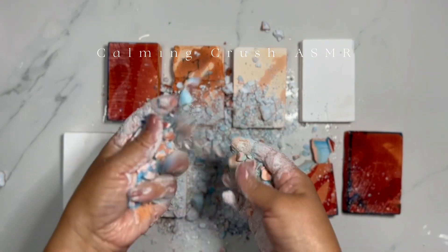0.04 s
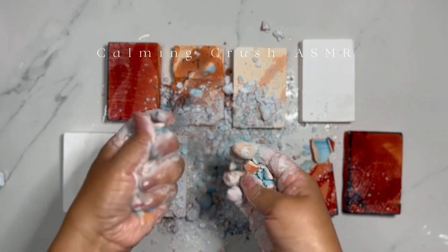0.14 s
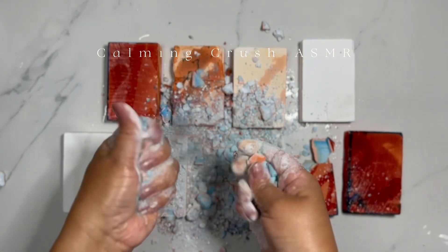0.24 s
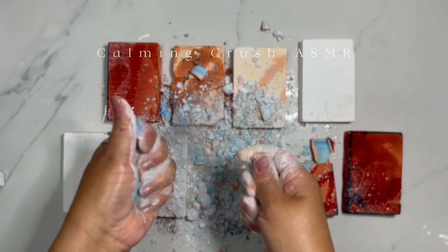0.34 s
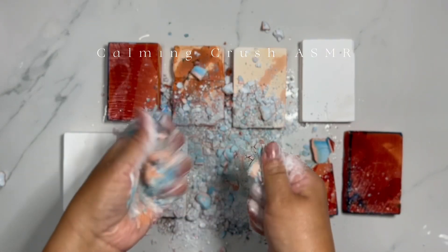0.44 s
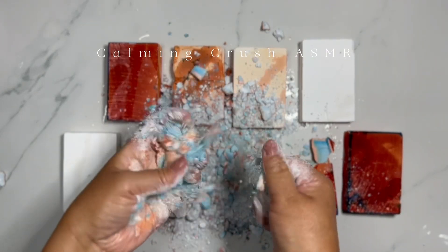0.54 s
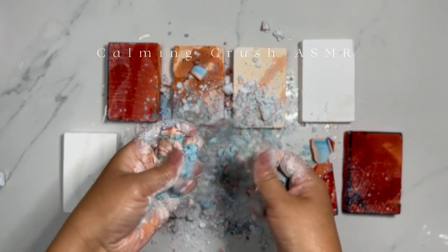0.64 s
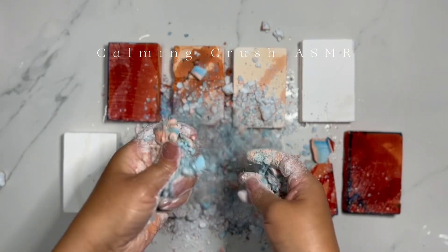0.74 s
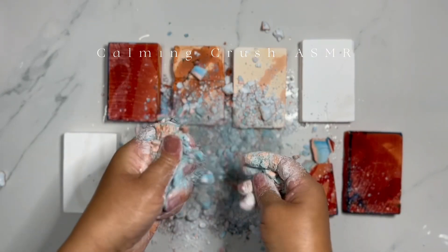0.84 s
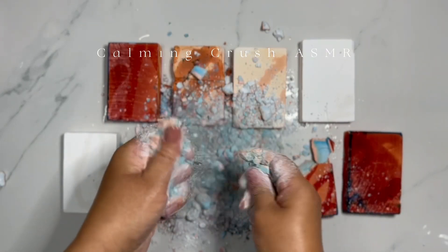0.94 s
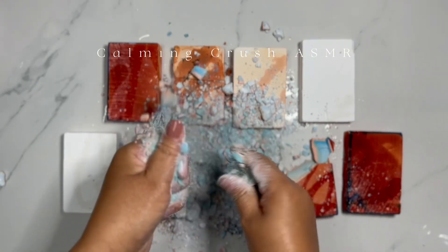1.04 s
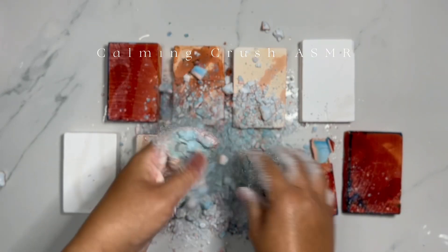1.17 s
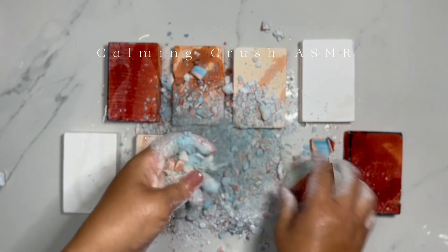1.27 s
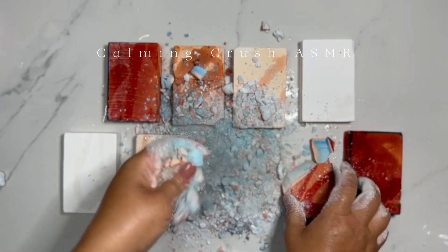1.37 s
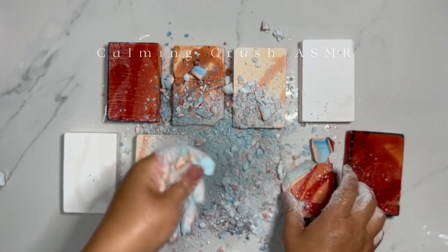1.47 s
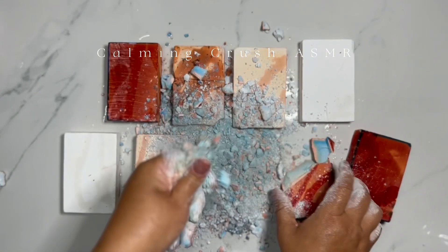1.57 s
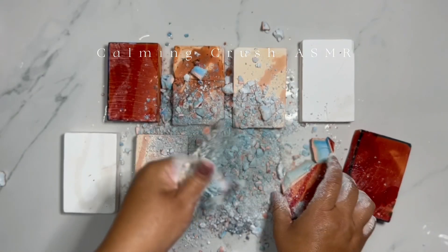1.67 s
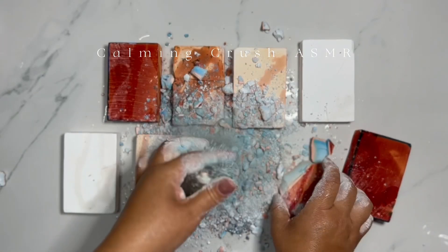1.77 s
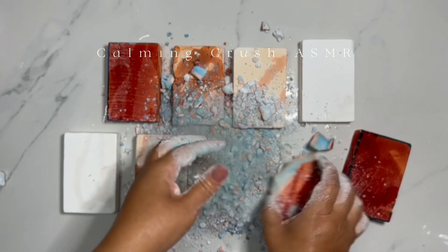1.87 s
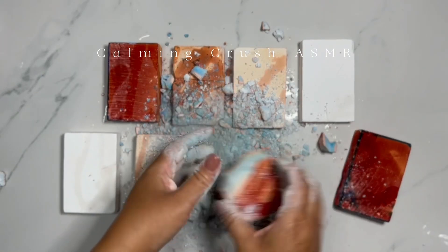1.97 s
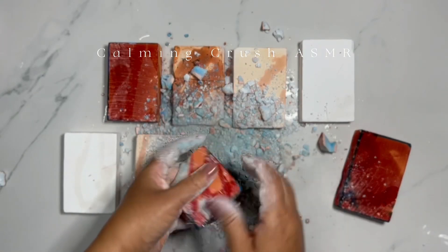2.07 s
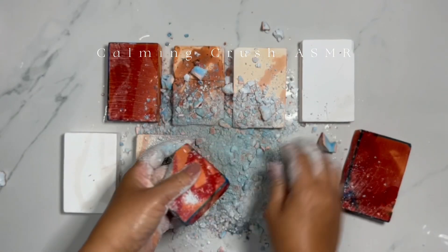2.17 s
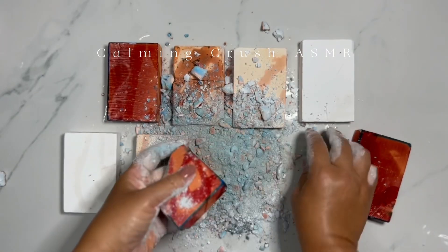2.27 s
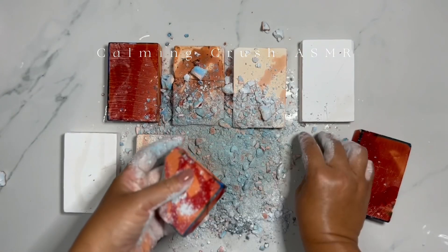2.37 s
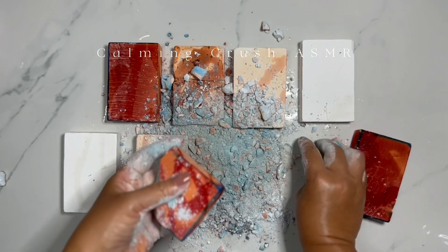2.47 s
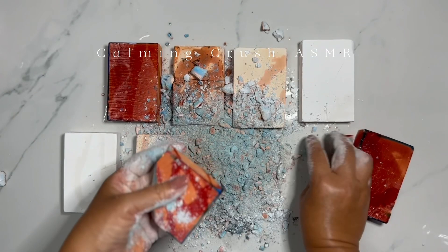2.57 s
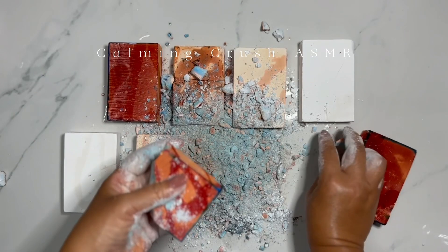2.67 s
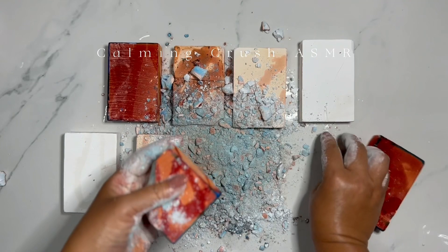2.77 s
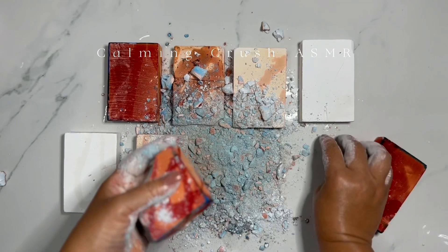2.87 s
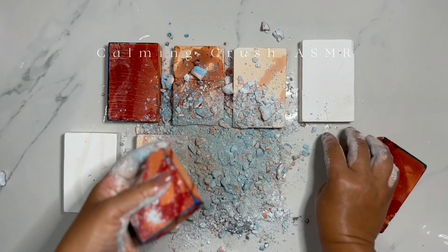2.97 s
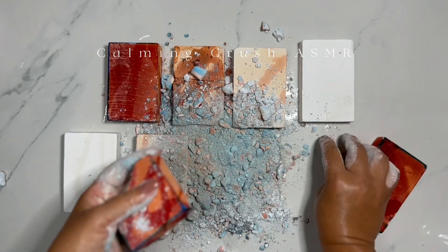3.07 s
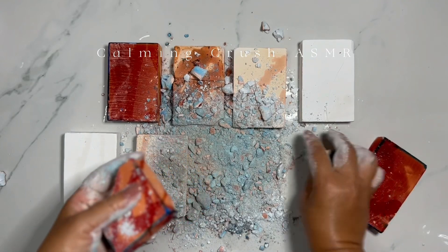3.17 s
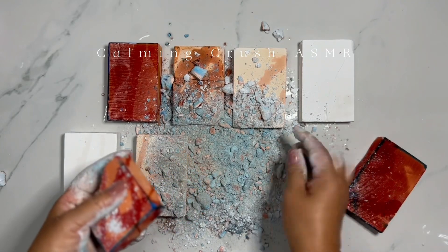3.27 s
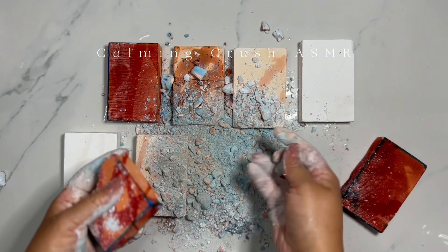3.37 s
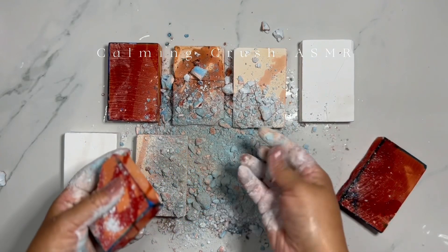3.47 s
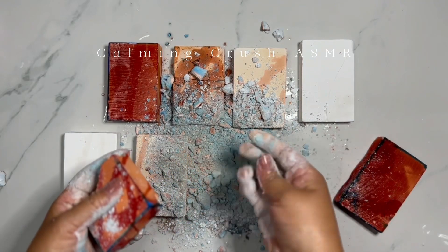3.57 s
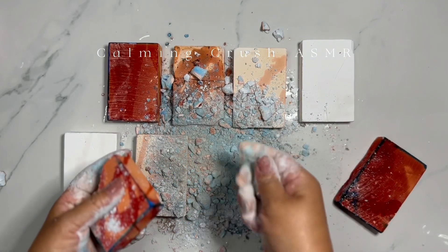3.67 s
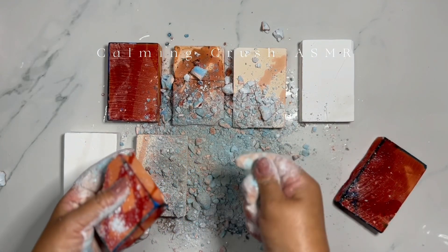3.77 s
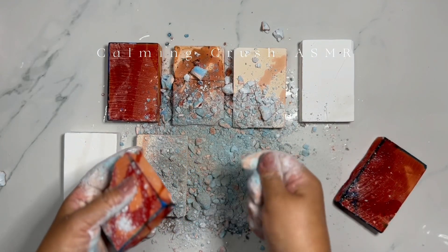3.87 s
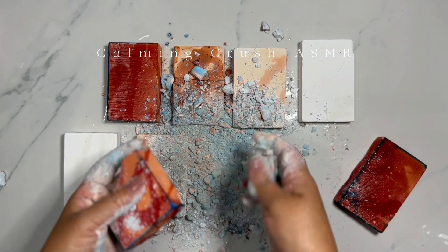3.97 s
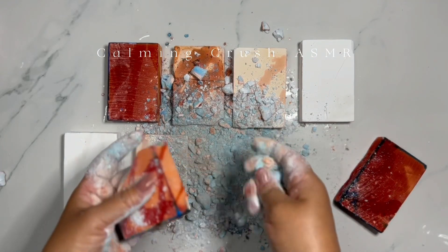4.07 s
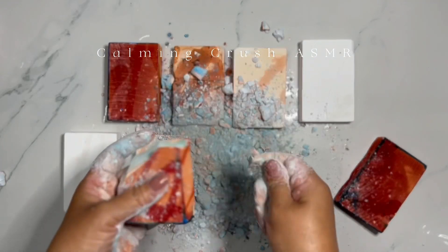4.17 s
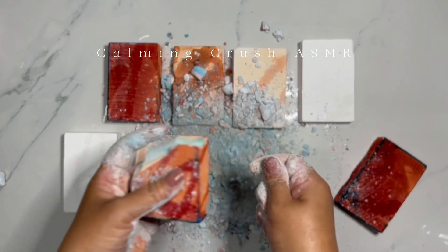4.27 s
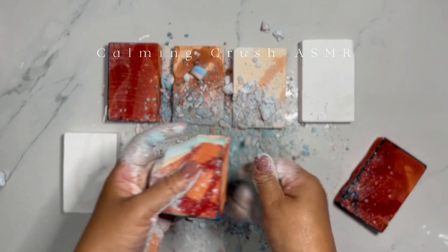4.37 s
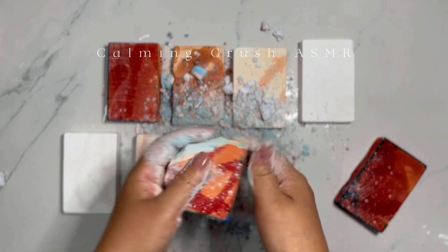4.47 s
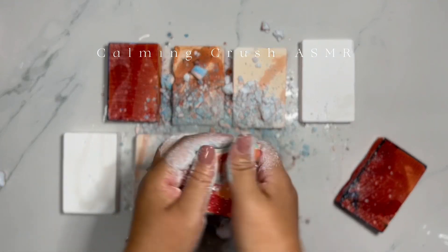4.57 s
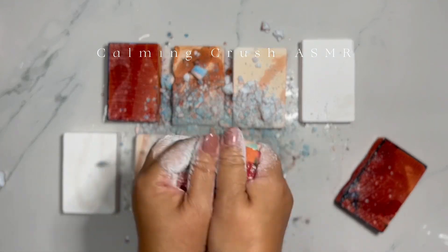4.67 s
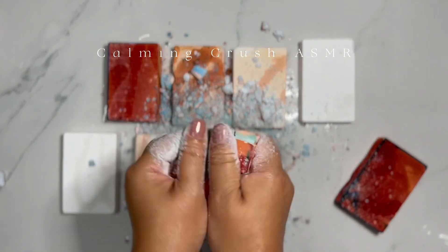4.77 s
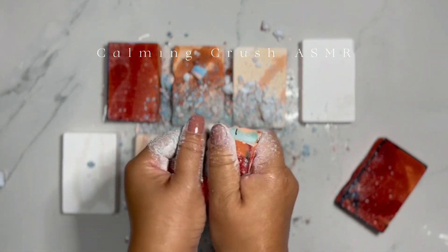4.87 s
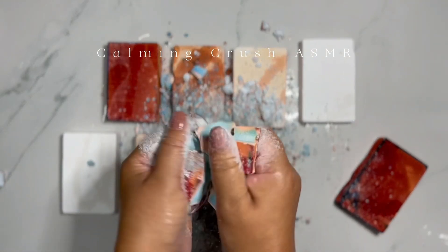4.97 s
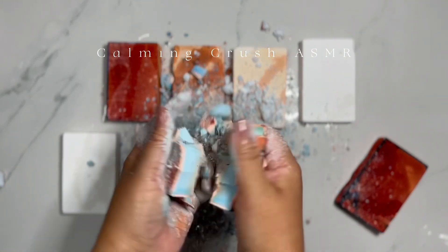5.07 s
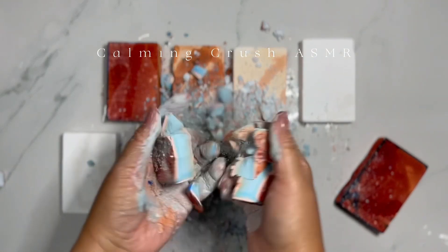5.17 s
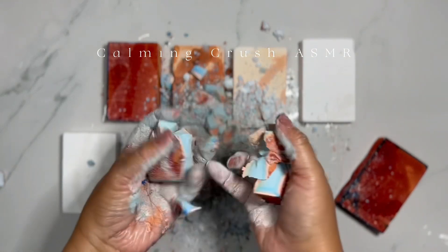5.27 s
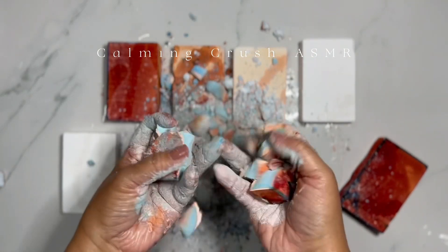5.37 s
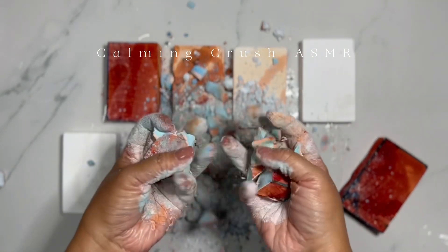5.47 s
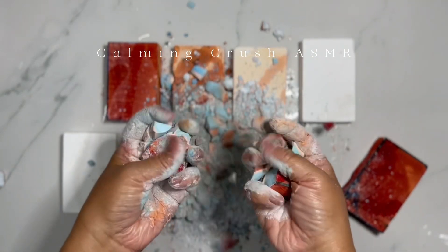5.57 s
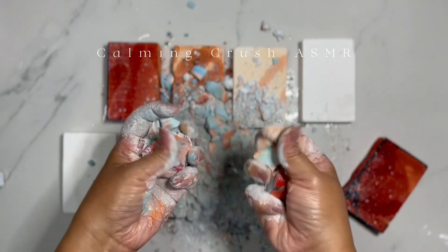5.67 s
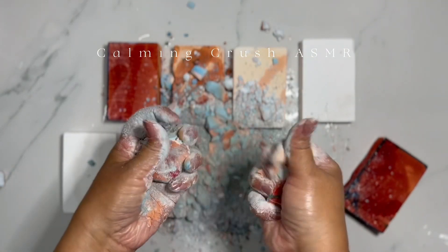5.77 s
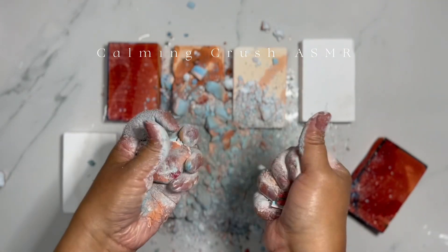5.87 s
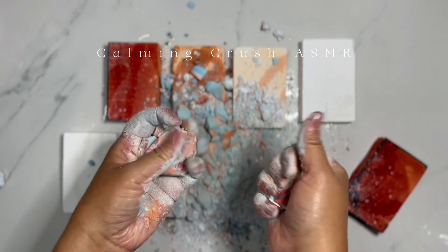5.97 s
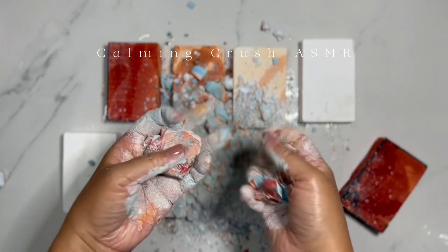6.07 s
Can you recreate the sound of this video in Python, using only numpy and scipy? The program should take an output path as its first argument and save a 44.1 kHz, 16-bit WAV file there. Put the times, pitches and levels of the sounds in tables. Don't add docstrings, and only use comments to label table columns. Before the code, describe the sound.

A low, steady appliance hum and soft room air run throughout a small, lightly echoing room. From 0 to 1.8 seconds, hands close to a stereo microphone pair crush chalk: gritty grinding, irregular crisp snaps and trickling crumbs, with soft deep thumps on the stone table and a clear crack at 1.3. Around 1.9 to 2.2, hard chips tick and ring faintly as another piece is picked up. From 2.2 to 3.3 it is nearly quiet, with only faint rubbing and a low thump near 2.95. A thump at 3.4 leads to a sharp snap at 3.65, then light crackles. At 4.7 the block breaks in a loud, dense cluster of cracks with a knock, with another crack at 4.9. From 5.15 snaps and thumps build into a bright, gritty crunch peaking near 5.7, then fade into fine crumbling by 6.1.

```python
import sys
import numpy as np
from scipy import signal
from scipy.fft import rfft, irfft, next_fast_len
from scipy.io import wavfile
from scipy.ndimage import map_coordinates

SR = 44100
rng = np.random.default_rng(int(sys.argv[2]) if len(sys.argv) > 2 else 0)


def store_pcm(level_fs):
    pcm = np.round(np.clip(level_fs, -1, 1) * 32767).astype(np.int16)
    wavfile.write(sys.argv[1], SR, np.atleast_2d(pcm).T)


def rack_gain(trim_db):
    fader = np.asarray(trim_db, float)
    return 10 ** (fader / 20)


N = 269892


def unit_power(x):
    return x / np.sqrt(np.mean(x ** 2) + 1e-20)


def at_hz(points, hz, column=1):
    points = np.array(points)
    return np.interp(np.log(hz), np.log(points[:, 0]), points[:, column])


def band(x, low_hz, high_hz):
    sos = signal.butter(2, [low_hz, high_hz], "band", fs=SR, output="sos")
    return signal.sosfilt(sos, x + 1e-18)


def ring(clicks, hz, t60):
    r, w = rack_gain(-60 / (t60 * SR)), 2 * np.pi * hz / SR
    return signal.lfilter([0, np.sin(w)], [1, -2 * r * np.cos(w), r * r], clicks + 1e-18)


def follow(power, t60):
    fall = rack_gain(-120 / (t60 * SR))
    return signal.lfilter([1 - fall], [1, -fall], power)


def grains(per_s, spread_db, smear_s):
    born = rng.random(N) < per_s / SR
    sizes = rack_gain(spread_db * np.minimum(rng.exponential(1, N), 4)) * born
    puffs = signal.lfilter([1], [1, -np.exp(-1 / (smear_s * SR))], sizes + 1e-18)
    return unit_power(puffs * rng.standard_normal(N))


# f/Hz, level per Hz/dB
AIR_COLOR = [(20, -30), (53, 1), (86, -13), (122, 0), (200, -27.5), (320, -14), (500, -18.5), (620, -28),
             (1080, -29), (2340, -39), (8000, -40.5), (11000, -41), (19000, -61)]
# f/Hz, likeness/1
AIR_LIKENESS = [(60, 1), (180, 0.41), (550, 0.089), (1650, 0.041), (4970, 0.017), (15000, 0.39)]


def room_air():
    out, edges = 0, 20 * 2 ** np.arange(0, 9.9, .5)
    white = rng.standard_normal((2, 2, N))
    for k, (low, high) in enumerate(zip(edges, edges[1:])):
        mid, side = band(white[k % 2], low, high)
        center = np.sqrt(low * high)
        alike = np.clip(at_hz(AIR_LIKENESS, center), -1, 1)
        pair = np.sqrt(1 + alike) * mid + np.sqrt(1 - alike) * side * [[1], [-1]]
        out = out + rack_gain(at_hz(AIR_COLOR, center)) * pair
    return rack_gain(-54.5) * unit_power(out)


# f/Hz, width/Hz, level/dB
RUMBLES = [(56.4, 10.2, -52), (104.3, 3.3, -59), (115.64, 2.7, -54), (131, 7.2, -61), (178, 4.2, -75),
           (291, 37, -67)]


def hum():
    mains_hz, mains_db = 120.5, -57
    out = rack_gain(mains_db) * np.sqrt(2) * np.sin(2 * np.pi * mains_hz * np.arange(N) / SR)
    for hz, width_hz, db in RUMBLES:
        t60 = np.log(1000) / np.pi / width_hz
        out = out + rack_gain(db) * unit_power(ring(rng.standard_normal(N), hz, t60))
    return out


# f/Hz, t60/s, level/dB
ROOM_ECHO = [(302, 0.49, 11.5), (796, 0.14, 7.5), (2000, 0.11, 8.5), (5500, 0.072, 7.5), (12900, 0.14, 3.5)]


def room(x):
    onset_s, early_share, early_t60 = .005, .1, .05
    out, edges = 0, 200 * 1.5 ** np.arange(12.3)
    white, rise = rng.standard_normal((2, 2, N)), np.exp(-1 / (onset_s * SR))
    for k, (low, high) in enumerate(zip(edges[:-1], np.minimum(edges[1:], 19500))):
        center = np.sqrt(low * high)
        power = signal.lfilter([1 - rise], [1, -rise], band(x, low, high) ** 2)
        late = follow(power, at_hz(ROOM_ECHO, center))
        early = follow(power, early_t60)
        mixed = (1 - early_share) * late + early_share * early
        level = rack_gain(at_hz(ROOM_ECHO, center, column=2)) * np.sqrt(np.abs(mixed))
        out = out + level * unit_power(band(white[k % 2], low, high))
    return out


def surroundings(x):
    t = np.arange(SR // 5) / SR
    echoes = rng.standard_normal((2, len(t))) * rack_gain(-60 * t / 0.3) * (t > .001)
    echoes = echoes / np.sqrt(np.sum(echoes ** 2) / 2)
    return signal.fftconvolve(x[None], echoes, axes=1)[:, :N]


# t/s, delay of the left port/samples
LEFT_DELAY = [(0, 2), (.23, 4), (.45, 4), (.6, 1), (1.3, 1.5), (3.4, 3.5), (3.65, 4), (4.3, 3), (5.45, 1.5),
              (5.58, 2.5), (5.72, 4.5), (5.85, 3)]


def at_ports(x, pan_db):
    bounce_ms, bounce_db = (.09, .6), -15
    lag = np.interp(np.arange(N) / SR, *np.transpose(LEFT_DELAY)) / 2
    ports = []
    for side, ms in zip((-1, 1), bounce_ms):
        moved = map_coordinates(x, [np.arange(N) + side * lag], order=3)
        direct = rack_gain(-side * pan_db / 2) * moved
        ports.append(direct + rack_gain(bounce_db) * np.roll(direct, round(ms * SR / 1000)))
    return np.array(ports)


def struck(hits, modes, soft_hz, scatter_db):
    at, out = [round(s * SR) for s in hits[:, 0]], 0
    for hz, level_db, t60 in modes:
        clicks = np.zeros(N)
        clicks[at] = rack_gain(hits[:, 1] + level_db + scatter_db * rng.standard_normal(len(hits)))
        out = out + ring(clicks, hz, t60)
    return signal.sosfilt(signal.butter(2, soft_hz, fs=SR, output="sos"), out)


# t/s, boom level/dB, knock level/dB
LANDINGS = [(0.031, -37.5, -51), (0.171, -34.5, -49), (0.452, -52, -50), (0.798, -41, -63),
            (1.09, -33.5, -41), (1.308, -50, -51), (2.198, -42, -53), (2.95, -40, -74),
            (3.387, -34.5, -45.5), (3.659, -60, -62), (4.714, -39, -32), (4.749, -40.5, -35),
            (4.883, -63, -44), (5.18, -31.5, -43), (5.498, -33.5, -41), (5.55, -51, -46), (5.718, -56, -58),
            (5.836, -33.5, -38)]
# f/Hz, level/dB, t60/s
BOOM_TONES = [(132.9, -4, 0.57), (106, -26, 1), (167.6, -27.5, 1)]
# f/Hz, level/dB, t60/s
KNOCK_TONES = [(228, -35, 0.71), (302, -1.5, 0.093), (350.7, -10.5, 0.28), (470, -11, 0.21),
               (527, -17.5, 0.28), (740, -11, 0.068)]


def table_thumps():
    landings = np.array(LANDINGS)
    boom = struck(landings[:, :2], BOOM_TONES, soft_hz=513, scatter_db=1.5)
    knock = struck(landings[:, ::2], KNOCK_TONES, soft_hz=1500, scatter_db=4.0)
    return boom + knock


# t/s, level/dB, f/Hz, t60/s
CHIP_HITS = [(1.916, -54, 7070, .12), (1.916, -60, 2570, .15), (2.028, -54, 7500, .1),
             (2.034, -62, 6400, .15), (2.035, -57, 4600, .2), (2.035, -58, 5460, .13),
             (2.035, -55, 15400, .1), (2.04, -57, 1990, .14), (2.04, -55, 3220, .2), (2.046, -60, 4300, .1),
             (2.048, -61, 2650, .08), (2.04, -58, 3935, .14), (2.205, -58, 11100, .12),
             (2.21, -56, 10650, .12), (2.33, -66, 3950, .12), (2.69, -67, 5330, .2), (2.72, -68, 5300, .2),
             (2.75, -68, 4500, .2), (2.79, -68, 4430, .2), (3.385, -50, 1780, .025),
             (3.385, -56, 2600, .09), (3.386, -57, 1110, .06), (3.403, -60, 1700, .04),
             (4.012, -65, 2050, .08), (4.32, -58, 7700, .06), (4.62, -37, 4480, .08),
             (5.158, -40, 6100, .12), (5.158, -42, 7600, .07), (5.19, -52, 4250, .1), (5.4, -56, 5600, .08),
             (5.29, -56, 6750, .07), (5.35, -40, 13900, .05), (1.121, -45, 3450, .03)]


def chips():
    out, size = np.zeros(N + SR), SR // 3
    fade = np.exp(-np.arange(size) / SR / .004) / 9
    for s, db, hz, t60 in CHIP_HITS:
        scuff = rng.standard_normal(size) * fade
        pair = ring(scuff, hz * .994, t60) + ring(scuff, hz * 1.008, t60)
        at = round(s * SR)
        out[at:at + size] += rack_gain(db + 3.5) * pair / np.abs(pair).max()
    return out[:N]


def shards(level_db):
    born = rng.random(N) < 500 / SR
    sizes = rack_gain(5.4 * np.minimum(rng.exponential(1, N), 2.2)) * born
    pitches, dealt = np.geomspace(1300, 15500, 26), rng.integers(0, 26, N)
    rings = sum(ring(sizes * (dealt == k), hz, 0.03) for k, hz in enumerate(pitches))
    return rack_gain(level_db) * unit_power(rings)


def debris(breaks):
    crumbs = grains(per_s=770, spread_db=4.0, smear_s=0.00124)
    later, out = np.roll(breaks, 260), 0
    for low, high, db in ((650, 1350, 1.5), (1700, 2720, 0.5), (3520, 6500, -1.0), (7600, 19000, -17.0)):
        power = follow(band(later, low, high) ** 2, 0.25)
        out = out + rack_gain(db) * np.sqrt(power) * unit_power(band(crumbs, low, high))
    return out


# t/s, level/dB, coarseness/dB, left over right/dB
RUBBING = [(0.0, -62.5, 13, 1.5), (0.27, -55, 6, 2.5), (0.4, -60, 5, -2), (0.75, -57.5, 7, 4),
           (1.1, -73.5, 13, 1.5), (1.5, -57.5, 6, 2.5), (1.84, -66, 10.5, 1.5), (2.1, -75.5, 16, 0),
           (2.5, -77, 11.5, -3), (2.85, -77, 0, -7), (3.2, -78.5, 13.5, -7), (3.5, -78, 10, 0),
           (3.699, -82.5, 24, 1.5), (4.45, -66, -1, 0.5), (4.9, -60, 3, 2), (5.2, -68.5, 1, 2),
           (5.7, -54.5, 6, 3.5), (6.12, -71, 7, -0.5)]
# t/s, level/dB, build-up/s, coarseness/dB
FIST_SQUEEZES = [(0.1, -55, 0.1, -3), (0.268, -48, 0.261, 2), (0.66, -52, 0.12, 6), (0.715, -55, 0.05, 9),
                 (0.76, -62, .04, 11), (0.969, -52.5, 0.14, 5), (1.14, -52, 0.037, 7),
                 (1.21, -62, 0.065, 14), (1.5, -56, 0.34, 6.5), (1.62, -61.5, 0.09, -9),
                 (1.68, -62, .08, 1.5), (1.798, -54, 0.14, 8.5), (2.11, -70, 0.2, -4),
                 (2.54, -70.5, 0.11, 17.5), (2.81, -67.5, 0.32, -6), (2.97, -80, 0.044, 19.5),
                 (3.61, -56.5, 0.023, -3), (3.75, -54, 0.066, 3), (4.141, -58.5, 0.15, -2.5),
                 (4.6, -67, 0.14, 5), (4.7, -58, 0.29, 6.5), (5.13, -73, 0.041, -9),
                 (5.35, -64, 0.051, -19.5), (5.52, -64, 0.055, -10), (5.63, -46.5, 0.19, 4.5),
                 (5.742, -36, 0.03, 0.5), (5.95, -55.5, 0.1, -5), (0.5, -69, .05, 5),
                 (0.62, -52.5, 0.08, 3.5), (5.175, -48, 0.029, -5), (0.389, -50, 0.11, 5),
                 (1.34, -57, 0.025, 15), (1.38, -55.5, 0.045, 9), (2.06, -66.5, 0.025, -13),
                 (2.22, -62.5, 0.044, -5), (2.35, -65, 0.14, -0.5), (3.41, -76, .03, 19),
                 (3.899, -60.5, 0.054, 5.5), (4.19, -59.5, .04, 8.5), (4.34, -57, 0.042, -2.5),
                 (4.53, -59, .04, -7.5), (5.3, -68, 0.051, -20.5), (3.05, -69, 0.069, 14),
                 (3.29, -80, 0.051, -15.5), (2.63, -76, 0.11, -14), (6.05, -65, 0.11, -1)]


def handwork():
    swell_db, let_go_s = 16.5, 0.065
    body_db, dust_db = -6.5, -10
    t = np.arange(0, N + 64, 64) / SR
    s, *columns = np.transpose(RUBBING)
    rub_db, coarse_db, pan_db = [np.interp(t, s, c) for c in columns]
    moves = [(rub_db, coarse_db)]
    for peak_s, db, rise_s, grit_db in FIST_SQUEEZES:
        away = np.maximum((peak_s - t) / max(rise_s, .02), (t - peak_s) / let_go_s)
        moves.append((db - swell_db * away, grit_db))
    curves = []
    for rel_db, lean in ((0, 0), (body_db, 1), (dust_db, -1)):
        power = sum(rack_gain(2 * (db + rel_db + lean * grit_db)) for db, grit_db in moves)
        curves.append(10 * np.log10(power))
    return [np.interp(np.arange(N) / SR, t, c) for c in (*curves, pan_db)]


def crumble(grind_db, body_db, dust_db):
    cracks = 0.67 * grains(per_s=500, spread_db=-2.5, smear_s=0.00097)
    cracks = cracks + grains(per_s=5200, spread_db=7.0, smear_s=0.00095)
    grind = unit_power(band(cracks, 2700, 8000) + 0.88 * band(cracks, 2420, 6600))
    body = unit_power(band(cracks, 210, 1740))
    dust = unit_power(band(cracks, 5700, 22000) + 1.1 * band(cracks, 12250, 12500))
    return rack_gain(-3.0) * (rack_gain(grind_db) * grind - rack_gain(body_db) * body - rack_gain(dust_db + 12.0) * dust)


# t/s, peak level/dB, f/Hz, t60/ms
PIECE_RINGS = [(3.6565, -16.5, 2620, 18), (3.6568, -24.5, 1390, 17), (3.6565, -22, 7700, 13),
               (3.6572, -34.5, 500, 22), (3.6385, -29.5, 2750, 17), (3.674, -25.5, 2400, 14),
               (3.739, -41.5, 1290, 28), (3.602, -41, 1280, 15), (4.7125, -15, 3550, 20),
               (4.7128, -18.5, 830, 23), (4.7082, -23, 950, 13), (4.7435, -23, 1100, 17),
               (4.7505, -20.5, 1100, 16), (4.751, -19, 2450, 25), (4.7525, -20, 4250, 22),
               (4.779, -20, 3200, 15), (4.781, -25.5, 4900, 14), (4.795, -33, 3400, 13),
               (0.0054, -42, 1360, 13), (0.2345, -39, 1420, 22), (0.22, -37, 2230, 16),
               (0.266, -42, 2250, 18), (0.076, -48, 8300, 25), (0.158, -34, 4400, 21),
               (0.449, -44.5, 770, 40), (5.546, -31, 2920, 21), (5.613, -34, 4700, 15),
               (5.7065, -37, 1200, 12), (5.7515, -32, 870, 11), (5.722, -28, 7300, 14),
               (5.7525, -28, 2250, 14), (5.5, -39, 2750, 16), (6, -45, 1400, 13), (1.3082, -15, 2600, 3),
               (1.3083, -23, 1190, 9.1), (1.3105, -26, 2700, 6.8), (4.7121, -10, 2160, 3.3),
               (3.6563, -22, 3600, 3.8), (5.7405, -16, 4600, 6.1), (5.7258, -17, 4400, 8),
               (5.7285, -27, 6500, 6), (5.4475, -31.5, 3000, 3), (5.581, -30, 5000, 3)]


def pieces():
    out, size = np.zeros(N + 4096), 4096
    click = np.arange(size) == 0
    for s, db, hz, t60_ms in PIECE_RINGS:
        at, t60 = round(s * SR) + 20, max(t60_ms, 2) / 1000
        tones = ring(click, hz, t60) + 0.23 * ring(click, hz * 1.066, t60 * 0.27)
        out[at:at + size] -= rack_gain(db) * tones
    return band(out[:N], 420, 16000)


# t/s, peak level/dB, ring f/Hz, edge against ring/dB
EDGE_CRACKS = [(0.1566, -25, 2620, 2), (0.21, -25.5, 4340, -0.5), (0.381, -33.5, 3440, -13),
               (0.597, -29.5, 2950, -16), (0.698, -33, 3200, -24), (0.8106, -43, 3100, -9),
               (0.927, -35, 2360, -5), (1.121, -31.5, 3400, -3), (1.288, -33.5, 3350, -17),
               (1.308, -28, 2360, -34), (1.3634, -27, 2650, -31), (1.7572, -37, 2720, -0.5),
               (3.602, -30.5, 3040, -1), (3.6379, -23.5, 2600, -14), (3.6560, -16.5, 2630, -1.5),
               (3.689, -29, 2560, -28), (4.7117, -14.5, 3240, -20), (4.7779, -15, 3400, -9),
               (5.447, -23.5, 3440, -3), (5.494, -33, 2200, 4), (5.545, -22.5, 3240, -1),
               (5.581, -19, 4930, 0.5), (5.6382, -31, 4220, 0.5), (5.688, -22, 3200, -9),
               (5.7218, -13.5, 3800, -6), (5.74, -32, 4500, -11), (5.7511, -21, 3460, 0),
               (5.727, -21, 5430, -6)]
# t/s, peak level/dB, ring f/Hz, body against ring/dB
LUMP_BREAKS = [(0.026, -45, 2880, -15), (0.233, -29, 2370, -18), (0.8932, -47.5, 2250, 2),
               (1.0844, -40, 1780, 7), (1.0925, -39, 1810, 9.5), (1.106, -39.5, 1500, 7.5),
               (1.1535, -36, 2040, -15), (1.3077, -26.5, 2650, 3.5), (1.9154, -38, 1980, 0),
               (3.3838, -54, 1900, 10), (3.674, -20.5, 2500, -23), (3.739, -34.5, 2580, -15),
               (4.138, -30, 2850, -13), (4.314, -41, 4080, -27), (4.6179, -27, 3600, -13),
               (4.7072, -21, 3250, -1), (4.7425, -25, 2400, 0.5), (4.7505, -16, 3350, -16),
               (4.8822, -19, 2700, -8.5), (5.1499, -36, 1450, 9), (5.157, -34, 2200, -11),
               (5.169, -30.5, 3500, 0), (5.2708, -39, 2520, 0.5), (5.7062, -32, 2370, -6),
               (5.722, -24, 1370, -15), (5.751, -24.5, 1320, -9), (4.712, -23, 1180, -5.5),
               (5.768, -28.5, 1620, -15), (5.8344, -43, 2550, 9.5)]
# t/s, peak level/dB, ring f/Hz
CRUMB_POPS = [(0.193, -31.5, 2600), (0.216, -38, 2390), (0.2654, -50, 2320), (0.281, -40, 2320),
              (0.337, -40.5, 1480), (0.4475, -38.5, 1500), (0.998, -42, 2100), (1.2145, -46, 1550),
              (1.345, -34, 2810), (1.41, -40, 3000), (1.4526, -49, 2410), (1.529, -37, 2730),
              (1.7083, -40.5, 2260), (2.026, -43, 3980), (2.044, -53, 3200), (3.8745, -47, 2320),
              (4.4271, -50, 1880), (4.495, -43.5, 3050), (5.2357, -42.5, 2970), (5.422, -36, 2180),
              (5.527, -42, 3180), (5.5654, -40, 4530), (5.6115, -27, 4800)]
# t/s, peak level/dB
BRIGHT_EDGES = [(0.025, -37), (0.338, -29.5), (0.424, -33), (0.4468, -25), (1.084, -30.5), (1.915, -32.5),
                (2.024, -28.5), (2.0463, -38), (2.1996, -38.5), (4.0432, -46), (4.317, -42), (4.71, -16),
                (4.743, -10), (4.749, -17), (4.8816, -21.5), (5.172, -18), (5.153, -29), (5.423, -32),
                (5.527, -22.5), (5.834, -37)]
# t/s, peak level/dB, ring f/Hz, length/ms
RUNNING_SPLITS = [(0.005, -39, 2190, 1.9), (0.626, -38, 2300, 5), (0.665, -41, 2600, 7.5),
                  (0.708, -36, 6460, 3.8), (0.95, -45.5, 2880, 6.5), (1.093, -49, 3100, 3.5),
                  (1.325, -39, 2000, 10), (3.3862, -67, 2300, 5.6), (3.655, -28, 7200, 2.8),
                  (3.70, -34.5, 2530, 5.8), (4.163, -40, 2960, 4.5), (4.205, -38.5, 6600, 3.4),
                  (4.536, -54, 2000, 2.2), (4.708, -22, 5470, 2.5), (4.7135, -24, 4000, 2.3),
                  (4.743, -25, 5500, 4), (4.7513, -19, 4230, 4.4), (4.7527, -23, 1150, 1.5),
                  (4.778, -20, 4300, 3.2), (4.8821, -18.5, 5660, 2.5), (5.166, -29.5, 5700, 6.2),
                  (5.348, -51, 2600, 3.4), (5.4472, -43, 6600, 2.5), (5.5263, -32, 6500, 3.5),
                  (5.5445, -32, 2130, 4.2), (5.5457, -23.5, 6450, 3.7), (5.687, -37, 2020, 3.5),
                  (5.7056, -31, 9000, 3), (5.689, -33, 11000, 7.8), (5.5805, -37, 12100, 6.5),
                  (5.7215, -21, 6500, 1.5), (2.027, -39, 11000, 7.5), (2.045, -35, 11500, 7.5),
                  (1.917, -44, 11300, 4.5), (2.095, -48, 850, 6.5), (0.159, -38, 10900, 5),
                  (0.448, -43, 890, 5.1), (0.0257, -45, 2980, 2.8), (2.869, -53, 5460, 3.8),
                  (3.765, -42.5, 7760, 2.9), (5.3743, -41, 5700, 3.5), (4.589, -54, 3000, 3.5),
                  (1.3085, -32, 1700, 0.75), (1.454, -43, 4600, 2.5), (1.49, -44, 2500, 5.5),
                  (1.79, -41, 2200, 7.1), (5.789, -34.5, 2500, 2.5), (4.7125, -14, 2540, 0.61)]


def breaks_by_kind():
    return ([(s, db - 1.5, -22.0, edge_db, hz, 1.8) for s, db, hz, edge_db in EDGE_CRACKS]
            + [(s, db, body_db, -14.0, hz, 3.0) for s, db, hz, body_db in LUMP_BREAKS]
            + [(s, db, -14.0, -21.0, hz, 2.1) for s, db, hz in CRUMB_POPS]
            + [(s, db - 30.0, -9.0, 30, 3000, 2.2) for s, db in BRIGHT_EDGES]
            + [(s, db, -24.0, -24.0, hz, ms) for s, db, hz, ms in RUNNING_SPLITS])


def snaps():
    out, size = np.zeros(N + 2048), 1024
    ms = np.arange(size) / SR * 1000
    for s, db, body_db, edge_db, hz, cluster_ms in breaks_by_kind():
        shape = np.minimum(ms / 0.26, 1) * np.exp(-ms / np.clip(cluster_ms, .3, 9))
        burst = rng.standard_normal(size) * shape
        burst[30:32] -= 2.0
        low, high = hz / 1.48, hz * 1.53
        lump = band(band(burst, low, high), low, high)
        lump = lump + 0.74 * band(burst, hz / 2.15, min(hz * 2.34, max(9000, hz * 0.85)))
        body = -band(burst, 372, 1580)
        edge = -band(burst, 7700, 14500)
        at = round(s * SR) + 20
        for part, rel_db in ((lump, 0), (body, body_db), (edge, edge_db + 0.5)):
            out[at:at + size] += rack_gain(db + rel_db) * part / np.abs(part).max()
    return out[:N]


def scene():
    grind_db, body_db, dust_db, pan_db = handwork()
    breaks = snaps() + pieces()
    hands = crumble(grind_db, body_db, dust_db) + breaks + rack_gain(-12) * debris(breaks)
    splinters = shards((grind_db + dust_db) / 2 + 2.5)
    echoes = rack_gain(-11) * room(hands) + rack_gain(-18) * surroundings(hands)
    direct = at_ports(hands + splinters, pan_db)
    return direct + echoes + table_thumps() + chips() + hum() + room_air()


# f/Hz, left over right level/dB
PORT_BALANCE = [(60, -1), (150, 0.5), (380, -2.5), (950, -3.5), (2380, -0.5), (5980, -5.5), (15000, -3)]


def low_pass(x):
    return signal.sosfilt(signal.butter(12, 16970, fs=SR, output="sos"), x)


def record(dry):
    port_lag_s, null_hz, port_hz, top_hz = 2.33e-4, 13430, 7600, 16000
    size = next_fast_len(N + 64)
    hz = np.arange(size // 2 + 1) * SR / size + 1
    lean_db = at_hz(PORT_BALANCE, hz) / 2
    lift_db = 4.9 * np.exp(-((hz - 15200) / 1200) ** 2)
    cut_db = 45.0 * (hz > top_hz)
    left, right = rfft(dry, size) * rack_gain(np.array([lean_db, -lean_db]) + lift_db - cut_db)
    own = .25 + .75 / (1 + (hz / port_hz) ** 12)
    late_left = left * np.exp(-2j * np.pi * (hz - null_hz) * port_lag_s)
    right = own * right - np.sqrt(np.abs(1 - own ** 2)) * late_left
    return low_pass(irfft(np.array([left, right]), size)[:, :N])


dry = scene()
out = record(dry)
store_pcm(out)
```